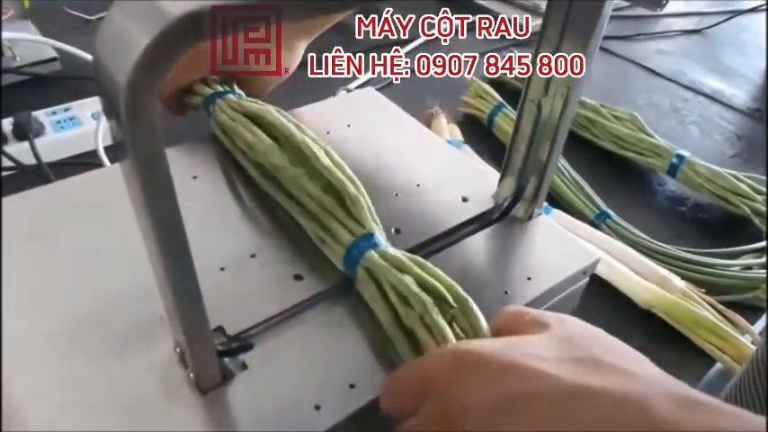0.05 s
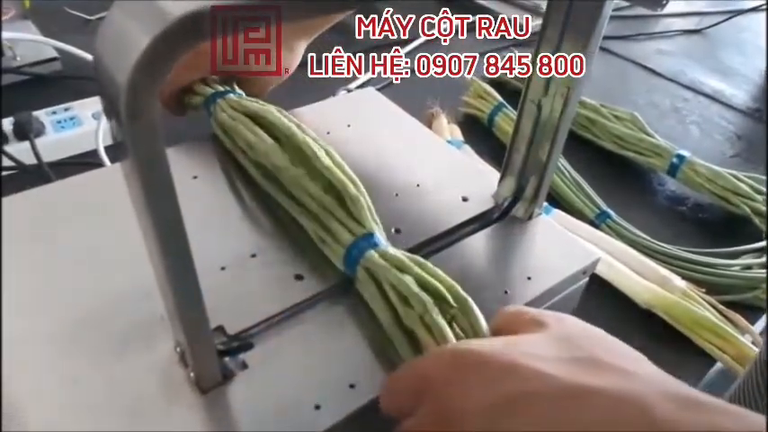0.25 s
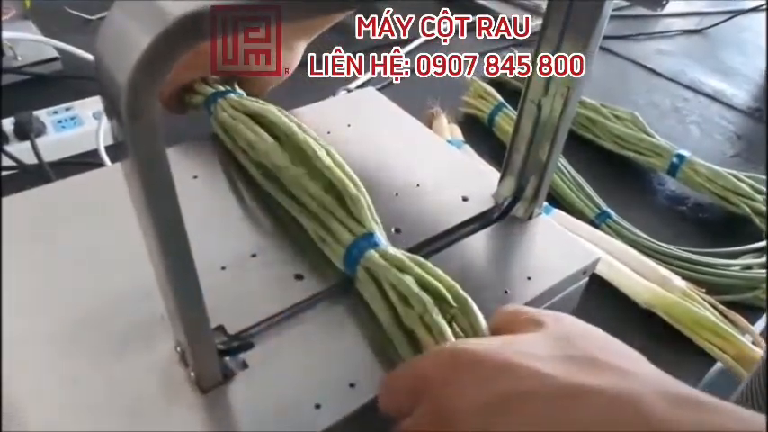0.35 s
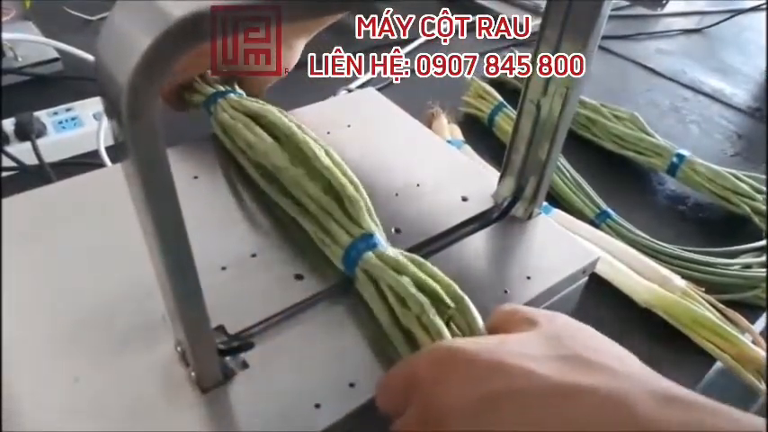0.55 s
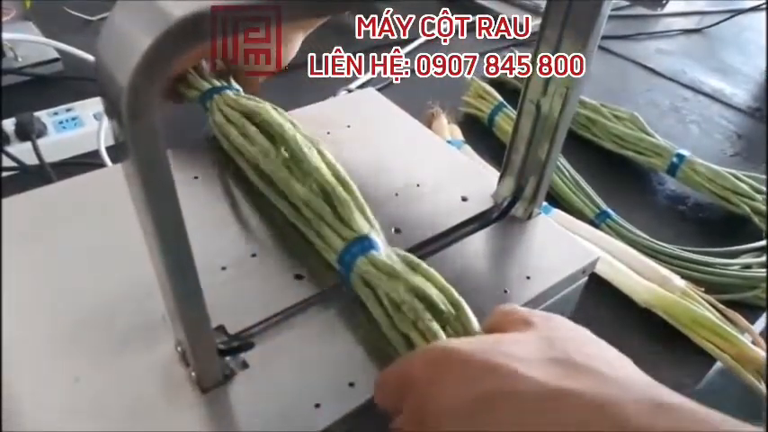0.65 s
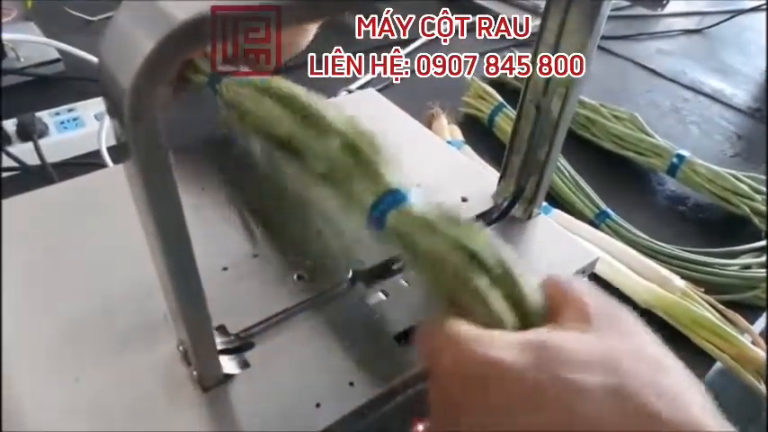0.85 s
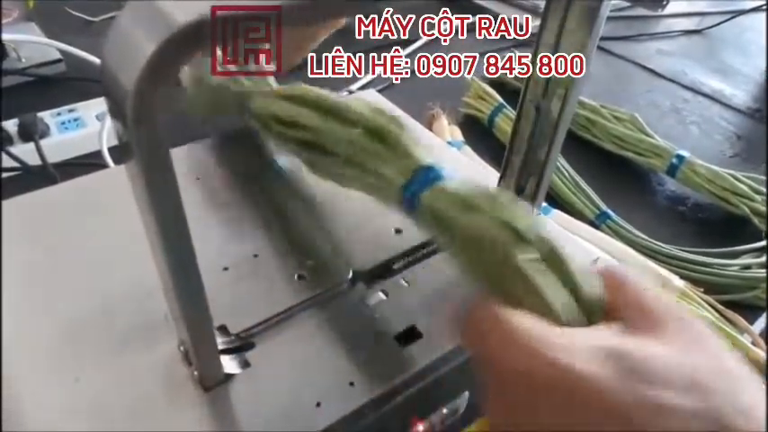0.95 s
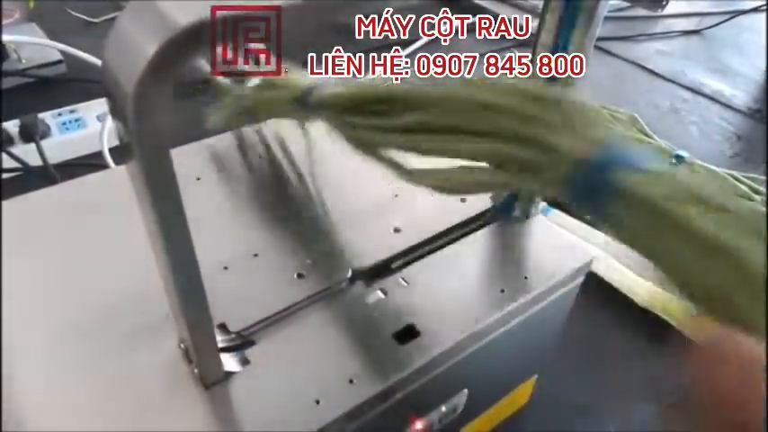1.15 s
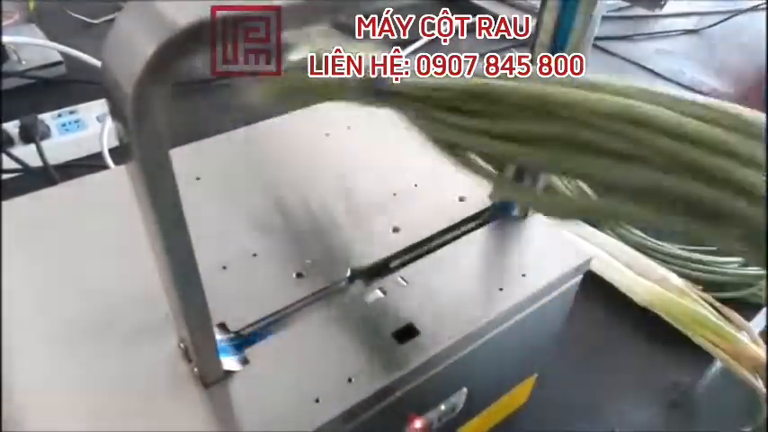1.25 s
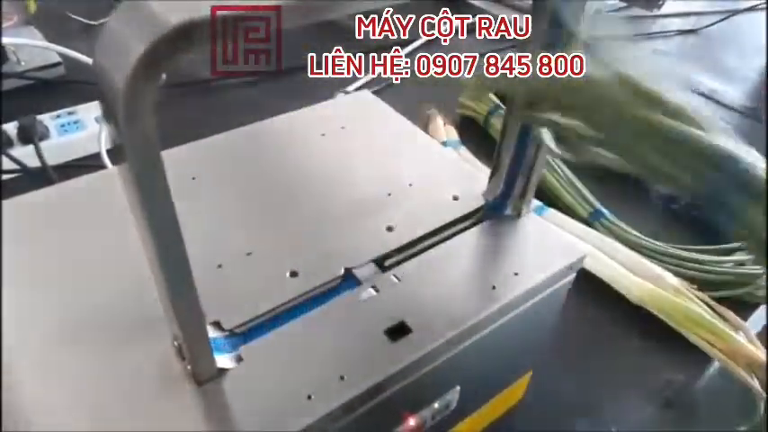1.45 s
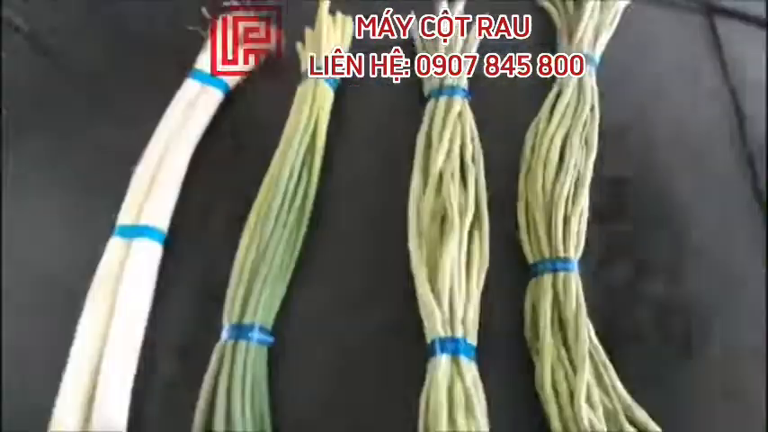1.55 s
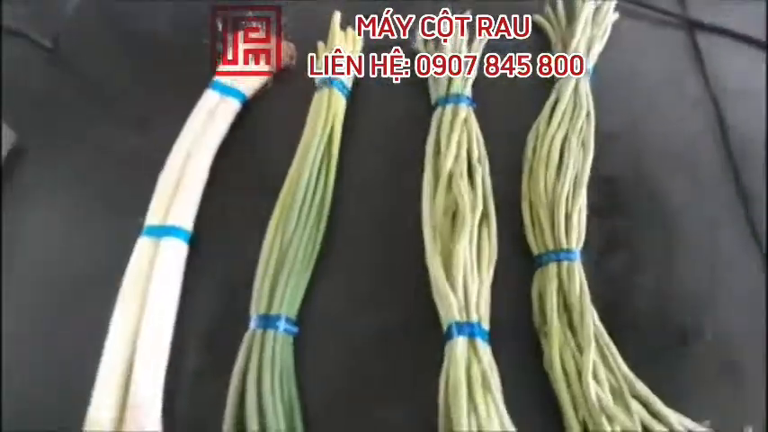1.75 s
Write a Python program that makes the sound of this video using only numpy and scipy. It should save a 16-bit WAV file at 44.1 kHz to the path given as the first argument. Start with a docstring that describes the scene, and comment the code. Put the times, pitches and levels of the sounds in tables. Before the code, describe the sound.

Over a steady workshop hum, a nearby tying machine straps a vegetable bundle: rattling, steel clacks and a brief squeak come first, followed by a whining motor with chattering tape and a final few clacks.

```python
"""A rattle and steel clacks over a steady workshop hum: one cycle of a vegetable tying machine,
heard close by on a stereo pair of microphones. The drive pulls the tape tight until it squeaks,
and the clamp clacks on the steel table. A geared motor then whines up and feeds new tape,
which squeals and chatters between the rollers; the mechanism clacks home."""
import sys
import numpy as np
from scipy import signal
from scipy.fft import rfft, irfft
from scipy.io import wavfile
from scipy.ndimage import uniform_filter1d

SR = 44100
rng = np.random.default_rng(int(sys.argv[2]) if len(sys.argv) > 2 else 0)


def master(y):
    """Save y as 16-bit WAV."""
    cut = np.clip(np.atleast_2d(y).T, -1, 1)
    pcm = np.round(cut * 32767)  # scale
    wavfile.write(sys.argv[1], SR, pcm.astype(np.int16))


N = 79380
TIME = np.arange(N) / SR


# feed motor run: t/s, gear mesh f/Hz, whine level/dB
MOTOR = [(.87, 950, -28), (.905, 1199, 1), (.932, 1599, 11), (.95, 1715, 1.5), (.995, 1826, -2.5),
         (1.045, 1800, -1.5), (1.075, 1747, -5.5), (1.11, 1733, 1), (1.18, 1691, -2), (1.21, 1700, -6),
         (1.27, 1547, -24)]
def feed():
    """The geared motor's teeth whine, left of centre, as it drives tape through the rollers."""
    mesh_cycles = np.cumsum(curve(MOTOR) * (1 + .012 * walk(383))) / SR
    friction = tape_friction(turns=mesh_cycles / 16)  # 16 teeth
    tape = tape_chatter(friction) + roller_squeal(friction, mesh_cycles)
    roughness = undb(3.5 * walk(98))
    whine = gain(MOTOR, column=2) * unit(np.sin(2 * np.pi * mesh_cycles) * roughness)
    return tape + undb(-28.5) * whine * pan(10.5)


# drag of the tape on the rollers: t/s, level/dB
TAPE_DRAG = [(.88, -18), (.932, -7), (.947, 1), (.972, -1), (1, -4.5), (1.052, -3.5), (1.063, 1.5),
             (1.11, 0.5), (1.188, 2), (1.203, -8.5), (1.25, -21.5), (1.31, -15.5)]
# snags of the tape: t/s, level/dB
TAPE_SNAGS = [(0.952, 1.5), (.981, -1), (0.996, 1), (1.019, -2.5), (1.035, 0), (1.158, -15), (1.178, -8)]
def tape_friction(turns, decay_turns=.5, snag_s=.004):
    """Envelope of the dragging tape, which slaps once a turn and sometimes snags."""
    slap_sizes = undb(.5 * rng.standard_normal(N))[turns.astype(int)]
    slaps = unit(slap_sizes * (.15 + np.exp(-(turns % 1) / decay_turns)))
    snags = sum(undb(db) * swell(at, snag_s) for at, db in TAPE_SNAGS)
    return gain(TAPE_DRAG) * slaps + snags


# chatter spectrum: f/Hz, level/dB
CHATTER_SPECTRUM = [(250, -42), (600, -11), (1400, -8.5), (2000, -5), (2650, 3), (2900, -3.5), (3400, -1),
                    (4400, 9), (5150, 4), (5600, -4.5), (7000, -10), (9500, -10), (12000, -9.5),
                    (13000, -32), (15500, -17)]
# chatter across the microphones: f/Hz, left minus right/dB
CHATTER_BALANCE = [(500, -5), (1800, 3), (3000, 0.5), (4300, -12.5), (5500, 0), (7200, 11), (9500, 11),
                   (12000, 3.5)]
def tape_chatter(friction):
    """The rollers scrape on the tape in bright pulses of noise."""
    return undb(-27.5) * radiate(friction * noise(), colour(CHATTER_SPECTRUM), across(CHATTER_BALANCE))


# squeal partials: multiple of the gear mesh, width/Hz, level/dB
SQUEAL_PARTIALS = [(2.005, 40.6, -0.5), (2.07, 61.3, 9.5), (2.2, 58, -17), (2.45, 56.5, 9),
                   (2.52, 35.2, -3), (2.57, 41, 0.5), (2.72, 64, -28), (2.99, 60, -17)]
def roller_squeal(friction, mesh_cycles):
    """The rollers slip on the tape in rough tones that follow the motor's pitch."""
    squeal = 0
    for multiple, width, db in SQUEAL_PARTIALS:
        slip = np.cumsum(uniform_filter1d(rng.standard_normal(N), 40)) * np.sqrt(2 * np.pi * width / SR)
        mic_phase = rng.uniform(0, 2 * np.pi) + np.array([[0], [np.pi / 2]])
        squeal += undb(db) * unit(np.sin(2 * np.pi * multiple * mesh_cycles + slip + mic_phase))
    return undb(-29.5) * friction * squeal * pan(-2)


# clamp and cutter hits: t/s, level/dB, decay/s, scrape re hit/dB, ring re hit/dB
STEEL_HITS = [(.2367, -28.5, 0.0074, -23, -5.5), (0.2534, -23, 0.01, -17, -13.5),
              (0.272, -28, 0.008, 8, -7), (0.3197, -22, 0.0077, -27, -9), (0.3804, -26, 0.0048, -23, -1.5),
              (0.4552, -22, 0.0035, -28, -1), (0.476, -43.5, 0.0071, -18, -3.5),
              (0.497, -17.5, 0.0037, -5, -8.5), (.515, -32.5, 0.016, 8, 0), (1.2123, -23, .006, -21, -5.5),
              (1.3843, -31.5, 0.007, -33, 1), (1.4054, -32.5, .008, 16, -28),
              (1.4308, -16.5, 0.0049, -10, -2), (1.44, -20, 0.0098, -1, -21),
              (1.4729, -20.5, 0.012, -1, -28)]
# crack spectrum: f/Hz, level/dB
CRACK_SPECTRUM = [(200, -13), (900, -11), (2000, -6.5), (2800, -2), (4000, -9), (4800, -6.5), (6500, -14),
                  (9000, -38), (15000, -25)]
# scrape spectrum: f/Hz, level/dB
SCRAPE_SPECTRUM = [(2000, 4), (5000, -11), (6500, -5), (10000, 1.5), (12500, -18), (15500, -9)]
# clamp resonances: f/Hz, width/Hz, level/dB
CLAMP_MODES = [(2187, 21, 15), (3060, 47, -26), (3947, 210, 20), (4450, 53, -26), (4520, 33, 13)]
# clacks and drive rattle across the microphones: f/Hz, left minus right/dB
METAL_BALANCE = [(300, -12), (1500, -1.5), (2300, 5), (3500, -9.5), (4500, -4), (5600, 0), (7500, 9),
                 (10000, 8), (13000, 4)]
def clacks():
    """Steel parts meet close to the microphones: a crack, a bright scrape and the ring of the clamp."""
    crack = scrape = ring = 0
    for start, db, decay, scrape_db, ring_db in STEEL_HITS:
        hit = undb(db) * blow(start, decay)
        crack += hit
        scrape += hit * undb(scrape_db)
        ring += hit * undb(ring_db)
    balance = across(METAL_BALANCE)
    return (radiate(crack * noise(), colour(CRACK_SPECTRUM), balance)
            + radiate(scrape * noise(), colour(SCRAPE_SPECTRUM), balance)
            + radiate(ring * noise(), modes(CLAMP_MODES), balance))


# tightening drive: t/s, rattle level/dB, rumble level/dB
DRIVE_LEVELS = [(.2, -19, -27), (.24, -3, -5.5), (.29, -4.5, 1.5), (.345, 2, -5.5), (.39, 3, -10),
                (.425, -13.5, -6.5), (.49, -1, -3.5), (.507, 7.5, 2.5), (.55, 5.5, -2.5), (.6, -6.5, -2),
                (.68, -14, -15.5), (.88, -12, -1.5), (.98, -51, -41), (1.22, -1.5, -16), (1.34, -6.5, -7),
                (1.41, -2, -12), (1.49, -2, 9.5), (1.56, -14.5, -21.5)]
# rattle spectrum: f/Hz, level/dB
RATTLE_SPECTRUM = [(350, -18), (600, -6.5), (1020, -21.5), (1080, -9), (1510, -5.5), (1690, -9.5),
                   (3160, -4.5), (3570, 3), (5440, -13.5), (10300, -24), (13500, -26), (15500, -49)]
# cabinet panel resonances, also rung by the thumps: f/Hz, width/Hz, level/dB
PANEL_MODES = [(255.7, 36.8, 5), (293.8, 13.3, -5.5), (411.4, 46, 1.5), (474, 20.6, -2), (555, 10.6, 2),
               (778, 21, -8.5)]
def drive(clicks_per_s=2200):
    """Cams and links rattle in dense small clicks and shake the cabinet."""
    contacts = rng.random((2, N)) < clicks_per_s / SR
    clicks = unit(contacts * np.sign(noise()) * undb(-.5 * noise()))
    rattle = radiate(clicks * gain(DRIVE_LEVELS), colour(RATTLE_SPECTRUM), across(METAL_BALANCE))
    rumble = radiate(noise() * gain(DRIVE_LEVELS, column=2), modes(PANEL_MODES))
    return undb(-32.5) * rattle + undb(-40) * rumble


# blows on the cabinet: t/s, level/dB, favoured f/Hz
CABINET_BLOWS = [(.277, -16, 455), (.328, -22, 235), (0.387, -25, 262), (0.504, -34, 234), (.533, -32, 402),
                 (1.438, -24.5, 238), (1.476, -30, 245), (1.486, -32, 490)]
def thumps(band_octaves=.45):
    """Heavier blows ring the cabinet panels, each favouring the modes near one pitch."""
    out, panels, f = 0, modes(PANEL_MODES), bins()
    for start, db, hz in CABINET_BLOWS:
        band = 1 / (1 + 1j * (f / hz - hz / f) / (band_octaves * np.log(2)))
        delay = np.exp(-2j * np.pi * f * start)
        ring = irfft(panels * band * delay)[:N]
        out += undb(db) * ring / np.abs(ring).max()
    return out * pan(-2.5)


# slips of the taut tape: t/s, width/s, f/Hz, level/dB
TAPE_SLIPS = [(.535, 0.0083, 3480, -34), (0.571, 0.0084, 3520, -17), (0.589, 0.012, 3520, -29.5)]
def tape_squeaks(waver=.01316):
    """The tape slips under tension with a wavering note, right of centre."""
    out = 0
    for at, width, hz, db in TAPE_SLIPS:
        phase = 2 * np.pi * np.cumsum(hz * (1 + waver * walk(456))) / SR
        out += undb(db) * swell(at, width) * unit(np.sin(phase))
    return out * pan(-8)


def spring(hz=15680):
    """A small steel part pings very high as the tape is cut."""
    return undb(-42) * blow(start_s=.5, decay_s=.043) * np.sin(2 * np.pi * hz * TIME)


def room(machine, t60_s=.22):
    """The workshop's short reverberation, below the direct sound at this close distance."""
    tail = unit(noise() * blow(0.0053, t60_s / np.log(1000))) / np.sqrt(N)
    return undb(-6.5) * signal.fftconvolve(machine, tail, axes=1)[:, :N]


# room tone spectrum: f/Hz, level/dB
SHOP_SPECTRUM = [(30, -20.5), (60, -28.5), (100, -22.5), (135, -14.5), (165, -19.5), (250, -4.5), (340, -5),
                 (450, -7), (700, -8), (1050, -2.5), (1350, -7), (2200, -4.5), (3000, -5.5), (4200, -6.5),
                 (5200, -17.5), (7000, -24.5), (11000, -35.5), (13000, -54), (15500, -25)]
# room tone across the microphones: f/Hz, left minus right/dB
SHOP_BALANCE = [(200, -2), (1500, 1.5), (3800, -2.5), (5500, 3.5), (8000, 7), (13000, 3)]
# room tone over time: t/s, level/dB
SHOP_LEVELS = [(0, -43), (.2, -40), (.3, -36.5), (.65, -34), (.85, -34.5), (1.3, -36.5), (1.6, -35),
               (1.8, -34.5)]
def workshop(hum_hz=256):
    """Room tone behind the machine: a steady rush of running machinery with a wavering hum."""
    rush = radiate(noise() * undb(.61 * walk(40)), colour(SHOP_SPECTRUM), across(SHOP_BALANCE))
    phase = 2 * np.pi * np.cumsum(hum_hz * (1 + .0092 * walk(15.2))) / SR
    hum = unit(np.sin(phase) * undb(4.2 * walk(17)))
    return undb(curve(SHOP_LEVELS)) * (rush + undb(-22) * hum)


# likeness of the two microphones: f/Hz, left-right correlation
MIC_CORRELATION = [(100, 0.63), (220, 1), (400, 0.92), (700, 0.58), (1100, 0.32), (2200, 0), (4000, 0),
                   (12000, 0)]
def radiate(pushes, response, pan_db=0, reflected_share=.81):
    """Two pushes excite a response; the microphones share the bass but get their own table echoes."""
    direct, unrelated = rfft(pushes, 2 * N)
    echoes = rfft(rng.standard_normal(N) * blow(0, decay_s=.0038), 2 * N)
    reflected = direct * echoes / np.abs(echoes)
    side = np.sqrt(reflected_share) * reflected + np.sqrt(1 - reflected_share) * unrelated
    likeness = across(MIC_CORRELATION)
    pair = np.sqrt((1 + likeness) / 2) * direct + np.sqrt((1 - likeness) / 2) * side * [[1], [-1]]
    return irfft(pair * unit(response) * pan(pan_db))[:, :N]


def undb(db):
    """Decibels to gain."""
    return 10 ** (np.asarray(db) / 20)


def unit(x):
    """Scale to an rms of one."""
    return x / np.sqrt(np.mean(x ** 2))


def curve(table, column=1):
    """One column of a table, joined by straight lines in time."""
    rows = np.array(table)
    return np.interp(TIME, rows[:, 0], rows[:, column])


def gain(table, column=1):
    """A dB column as a gain, silent outside the table's span."""
    return undb(curve(table, column)) * (TIME >= table[0][0]) * (TIME <= table[-1][0])


def bins():
    """Frequencies of the filter bins."""
    return np.maximum(np.arange(N + 1) * SR / (2 * N), 1)


def across(points):
    """Points joined on a log-frequency axis."""
    rows = np.array(points)
    return np.interp(np.log(bins()), np.log(rows[:, 0]), rows[:, 1])


def pan(db):
    """Microphone gains for a level difference, left minus right."""
    gains = undb(np.array([[.5], [-.5]]) * db)
    return gains / np.sqrt(np.mean(gains ** 2, axis=0))


def colour(points):
    """Causal response with the given spectrum."""
    cepstrum = irfft(np.log(undb(across(points))))
    return np.exp(rfft(np.r_[cepstrum[0], 2 * cepstrum[1:N]], 2 * N))


def modes(table):
    """Response of a set of resonances; dB is the relative energy of each."""
    f = bins()
    return sum((-1) ** k * undb(db) / np.sqrt(width) / (1 + 1j * (f * f - hz * hz) / (f * width))
               for k, (hz, width, db) in enumerate(table))


def noise():
    """Two unrelated white noises."""
    return rng.standard_normal((2, N))


def walk(rate_hz):
    """Smooth random wandering with a spread of one."""
    span = int(SR / rate_hz)
    return unit(uniform_filter1d(uniform_filter1d(rng.standard_normal(N), span), span))


def blow(start_s, decay_s, attack_s=.001):
    """Envelope of a contact: quick rise, exponential fall."""
    age = np.maximum(TIME - start_s, 0)
    return (1 - np.exp(-age / attack_s)) * np.exp(-age / decay_s)


def swell(at_s, width_s):
    """Bell-shaped envelope."""
    return np.exp(-((TIME - at_s) / width_s) ** 2)


def scene():
    """The machine up close, too small to radiate deep bass, with the workshop behind it."""
    machine = feed() + drive() + clacks() + thumps() + tape_squeaks() + spring()
    machine = signal.sosfilt(signal.butter(3, 180, "high", fs=SR, output="sos"), machine)
    return machine + room(machine) + workshop()


def record(dry):
    """The recorder cuts the top above 15.9 kHz."""
    return signal.sosfilt(signal.ellip(10, .2, 80, 15900, fs=SR, output="sos"), dry)


dry = scene()
out = record(dry)
master(out)
```